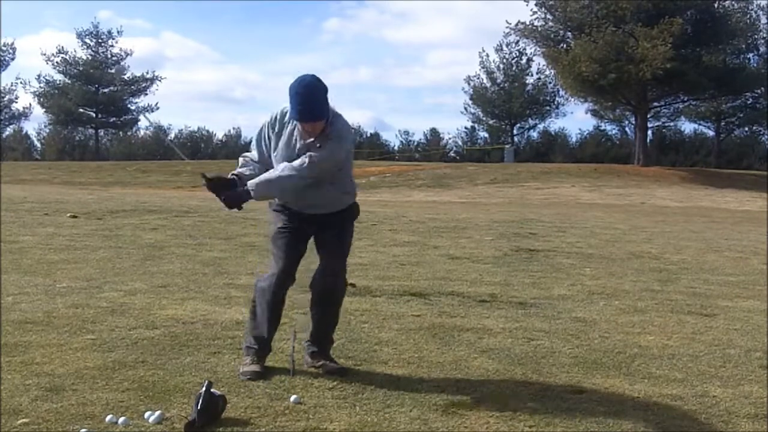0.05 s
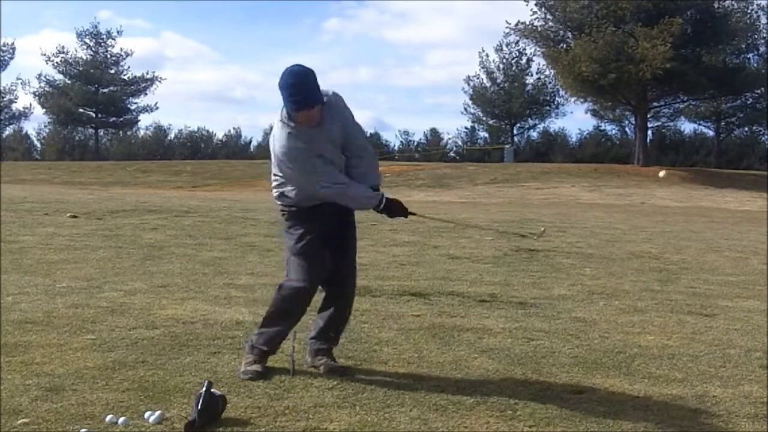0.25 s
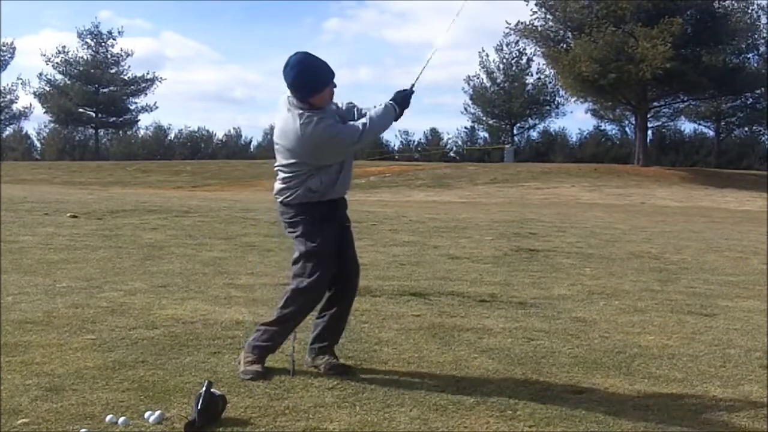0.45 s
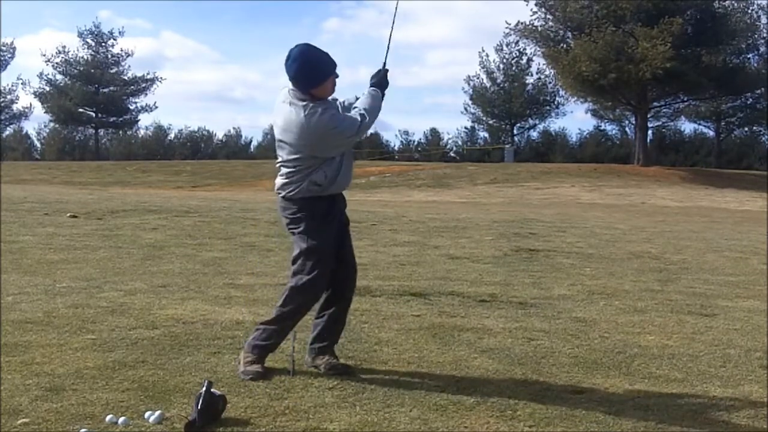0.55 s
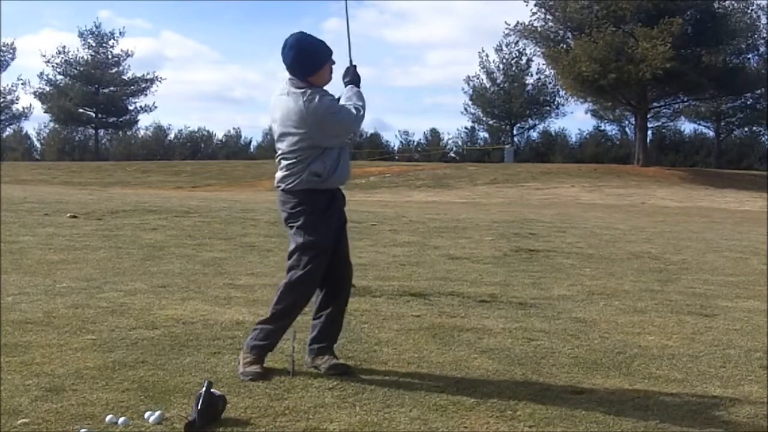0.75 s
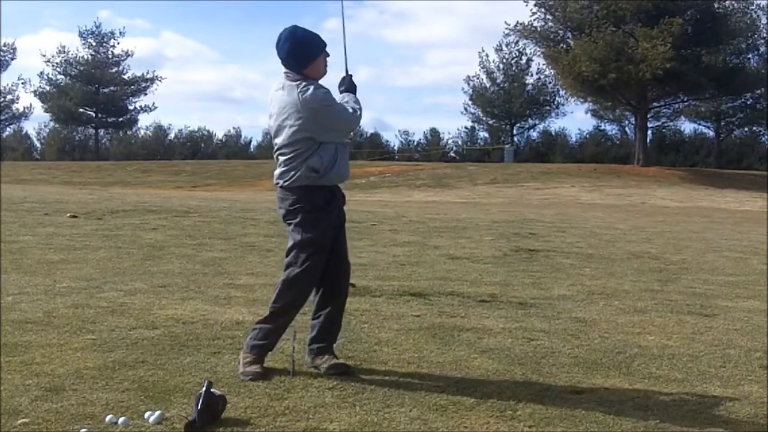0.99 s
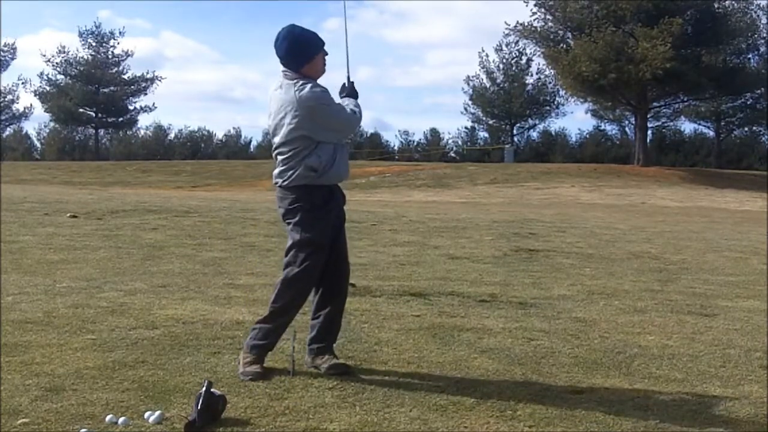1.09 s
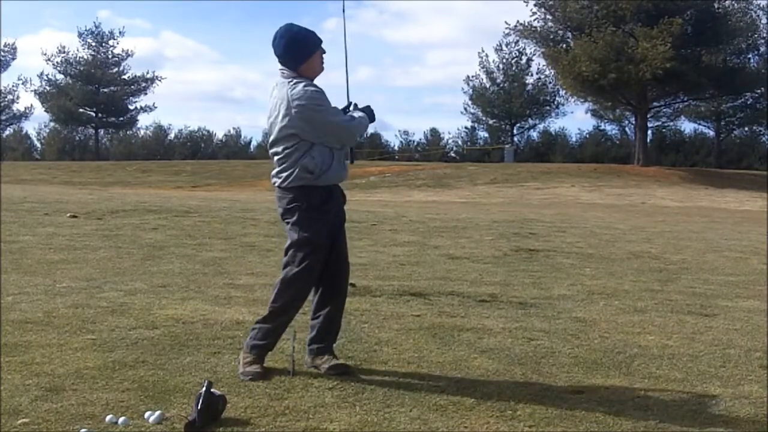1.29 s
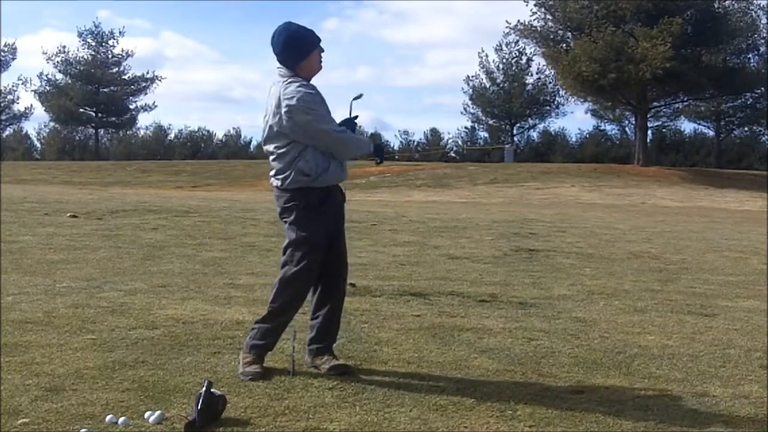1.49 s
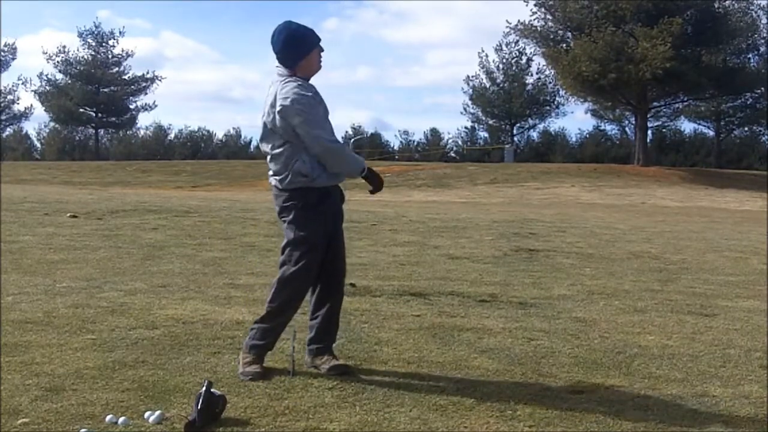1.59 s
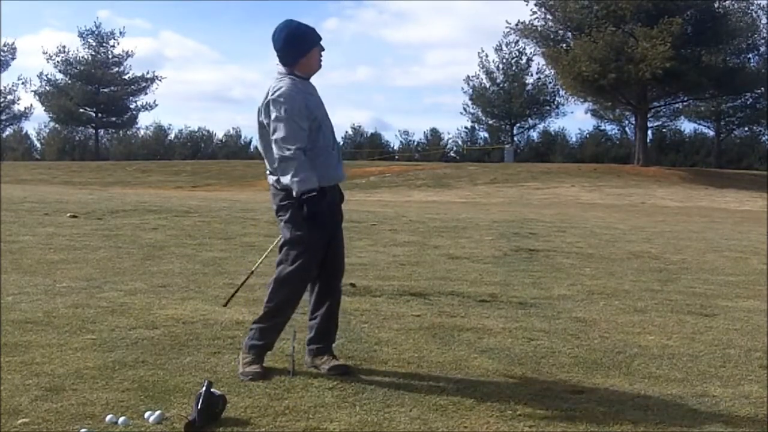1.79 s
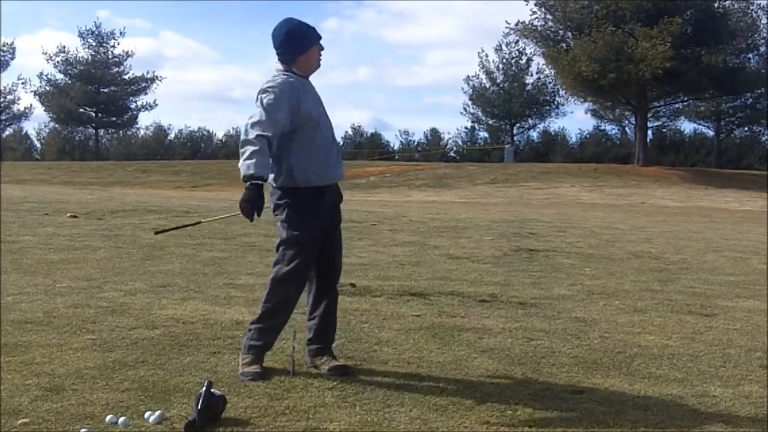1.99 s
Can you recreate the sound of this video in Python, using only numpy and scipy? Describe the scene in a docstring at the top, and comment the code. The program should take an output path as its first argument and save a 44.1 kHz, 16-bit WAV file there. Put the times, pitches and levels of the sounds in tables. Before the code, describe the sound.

A golf iron whooshes briefly and strikes a ball with a sharp, overloaded crack and a tiny scuff of turf, then faint jacket rustle, small ticks and light breeze outdoors, close microphone, mostly in the left channel.

```python
"""Outdoors on grass, an iron swishes down, clips a golf ball off the turf and swings through.
A jacket rustles, a few faint ticks follow, and breeze and a distant wash lie underneath.
Short pushes ring the club head and ball; shaped noise makes the rushing air, torn turf, cloth and wind.
One close microphone feeds the left input and overloads on the blow. The right input holds only
a faint upside-down leak of the left; both inputs have their own hiss and share a thin whine."""
import sys
import numpy as np
from scipy import signal
from scipy.fft import rfft, irfft
from scipy.io import wavfile
from scipy.ndimage import uniform_filter1d

SR = 44100
rng = np.random.default_rng(int(sys.argv[2]) if len(sys.argv) > 2 else 0)


def to_wav(sig):
    """Store sig (one row per channel, or 1-D mono) as 16-bit WAV at the path in sys.argv[1].

    Samples outside -1..1 are clipped; the rate is SR.
    """
    pcm = np.clip(np.atleast_2d(sig), -1, 1) * 32767
    pcm = np.round(pcm).astype(np.int16)
    wavfile.write(sys.argv[1], SR, pcm.T)  # frames by channels


def nominal_scale(level):
    """Amplitude ratio for a level in decibels (scalar or array-like)."""
    x = np.asarray(level, float) / 20
    return 10 ** x


N = 90404  # length in samples, about 2.05 s

# Source levels hold before the microphone gain. Noise spectra give only a shape (level per Hz):
# noise() brings each one to rms 1, and the source then sets its loudness.

# Touches of the club head with turf and ball: t/s, strength/dB, time to the peak of the push/ms
CONTACTS = [(.2438, -17.5, 0.18), (.2459, 0.5, 0.024), (.2468, -1, 0.022), (.2474, -7.5, 0.026),
            (.2484, -4, 0.042), (.2493, -6.5, 0.11), (.2507, -9.5, 0.048), (0.2522, -12, 0.02),
            (0.256, -16, 0.091), (0.2616, -26, 0.12)]
# Ringing tones of club head and ball, before trimming and damping: f/Hz, level/dB, time to fall 60 dB/s
HEAD_TONES = [(773, -12.5, .02), (1079, -5, 0.024), (1300, -7.5, .024), (1724, 2, 0.037), (2150, -2, 0.028),
              (2595, -6.5, .025), (3370, -10.5, 0.025), (3880, 6, .013), (4400, -6.5, 0.0095),
              (5227, -11.5, 0.024), (6912, -15.5, .02), (8950, -20.5, .015), (10550, -17, 0.0069),
              (13500, -18, .01)]
# Swing of the club: t/s, air rush level/dB, shaft whistle f/Hz
SWING = [(.14, -63, 279), (.188, -58, 340), (.21, -46.5, 380), (.222, -34.5, 390), (.236, -38.5, 325),
         (.246, -36, 315), (.262, -52, 315), (.28, -58, 320), (.31, -60.5, 325), (.34, -79, 320)]
# Spectrum of the air rushing round the head: f/Hz, level/dB
RUSH_SPECTRUM = [(400, -24.5), (600, -9), (900, -4), (1800, -7.5), (2500, -10), (5000, -28), (12000, -49.5),
                 (16000, -80.5)]
# Spectrum of torn grass and soil: f/Hz, level/dB
SPRAY_SPECTRUM = [(150, -30), (320, -4), (600, -8), (1200, -6.5), (2300, -3), (4000, -4.5), (6300, -12.5),
                  (10000, -24), (15000, -45.5)]
# Faint ticks: t/s, starting level/dB, f/Hz, time to fall 60 dB/s
TICKS = [(.348, -48.5, 812.5, 0.027), (.379, -51, 799.3, 0.028), (.437, -52.5, 1987, 0.047),
         (.6968, -47, 801, 0.0065), (.7, -42, 599, 0.012), (.6972, -46.5, 2499, .004),
         (.699, -48, 1600, 0.011), (0.7055, -53, 1300, 0.0071), (.782, -35, 2150, 0.0048),
         (0.785, -32.5, 1599, 0.0044), (.786, -37.5, 657, .01)]
# Loudness of the jacket rustle: t/s, level/dB
CLOTH_LEVEL = [(0, -64.5), (.1, -65.5), (.2, -70), (.3, -64.5), (.36, -60), (.4, -62), (.44, -58.5),
               (.48, -65), (.56, -69.5), (.7, -74), (1.0, -73.5), (1.3, -76.5), (1.68, -74.5),
               (1.76, -66.5), (1.84, -71), (1.92, -74), (2.05, -74)]
# Spectrum of the jacket rustle: f/Hz, level/dB
CLOTH_SPECTRUM = [(180, -35.5), (300, -3), (701, -4), (844, -2.5), (1450, -5), (2000, -5), (12000, -23),
                  (15600, -51), (22000, -120)]
# Loudness of breeze and body-moved air on the microphone: t/s, level/dB
WIND_LEVEL = [(0, -59.5), (.05, -60), (.19, -61), (.23, -54.5), (.25, -52.5), (.29, -52.5), (.36, -64),
              (.41, -52), (.44, -49), (.47, -54.5), (.53, -61.5), (.7, -66.5), (.78, -61), (1.0, -65.5),
              (1.3, -61.5), (1.53, -64.5), (1.6, -59.5), (1.66, -66.5), (2.05, -62)]
# Spectrum of that moving air: f/Hz, level/dB
WIND_SPECTRUM = [(15, -10), (30, -1), (60, -3), (120, -4), (250, -13), (500, -25), (900, -59.5)]
# Spectrum of the distant outdoor wash: f/Hz, level/dB
WASH_SPECTRUM = [(90, -19), (150, -0.5), (390, -5.5), (1400, -13), (3000, -20), (6000, -27), (15500, -40.5)]
# Spectrum of the input hiss: f/Hz, level/dB
HISS_SPECTRUM = [(30, -3), (300, 0), (2000, -3), (6000, -6.5), (15000, -10.5)]
# Hiss level over time, added to each input's own level: t/s, level/dB
HISS_LEVEL = [(0, 2.5), (.5, 2.5), (.65, 0), (2.05, 0)]
# Tones of the electronic whine, before each input's own gain: f/Hz, rms level/dB
WHINE_TONES = [(3058, -83), (5453, -77.5)]
# Constant shift of the waveform: one row for the left input, one for the right (full scale = 1)
STEADY_OFFSET = [
    [.0224],
    [.0015],
]


def curve(rows, col):
    """Draws one column of a table as straight lines over time."""
    rows = np.array(rows)
    t = np.arange(N) / SR
    return np.interp(t, rows[:, 0], rows[:, col], left=rows[0, col], right=rows[-1, col])


def noise(spectrum, grain_db=0):
    """Random noise of rms 1 with the given spectrum; grain_db lifts random short bits to make it grainy."""
    f, db = np.transpose(spectrum)
    white = rng.standard_normal(N)
    lift = np.minimum(rng.exponential(1, N // 40 + 1), 5)  # one draw for every 40 samples
    grainy = white * nominal_scale(grain_db * lift).repeat(40)[:N]
    hz = np.fft.rfftfreq(N, 1 / SR)
    gain_db = np.interp(np.log(hz + 1), np.log(f + 1), db, left=-90)
    shaped = irfft(rfft(grainy) * nominal_scale(gain_db), N)
    return shaped / shaped.std()


def resonate(x, hz, width_hz):
    """Lets through a narrow band, with gain 1 at its centre, that follows the curve hz."""
    turn = np.exp(2j * np.pi * np.cumsum(hz) / SR)
    r = np.exp(-np.pi * width_hz / SR)
    smoothed = signal.lfilter([1 - r], [1, -r], x / turn)  # the moving band, shifted down to 0 Hz
    return 2 * (turn * smoothed).real


def add(mix, s, sound):
    """Mixes a sound in at time s, in seconds."""
    part = mix[round(s * SR):][:len(sound)]
    part += sound[:len(part)]


def push_time(ms):
    """Time over 200 samples, counted in units of ms."""
    return np.arange(200) / SR * 1000 / ms


def blow():
    """Each contact is a short push that rings the damped head; the ball itself cracks once."""
    head_db, crack_db = -6.5, 1
    damping = .6  # share of the free ring time left by turf and hands
    ball_s, crack_ms = .2459, 0.046
    out, t = np.zeros(N), np.arange(2000) / SR
    ring = np.zeros(2000)
    for hz, db, t60 in HEAD_TONES:
        ring += nominal_scale(head_db + db - 60 * t / (t60 * damping)) * np.sin(2 * np.pi * hz * t)
    for s, db, ms in CONTACTS:
        u = push_time(ms)
        push = u * np.exp(-u)
        add(out, s, nominal_scale(db) * np.convolve(ring, push / push.sum()))
    u = push_time(crack_ms)
    crack = -nominal_scale(crack_db) * (1 - u) * np.exp(-u)
    add(out, ball_s - .0001, crack)
    # the blow holds little sound below this frequency in Hz
    low_cut = signal.butter(3, 301.4, "high", fs=SR, output="sos")
    return signal.sosfilt(low_cut, out)


def swing():
    """Air rushes round the head and the shaft sheds a fuzzy whistle that follows the rush."""
    whistle_db, width_hz = 5.5, 140  # whistle level over the rush at its loudest, and its band width
    steepness = 1.05  # whistle change in dB for each dB of rush
    t, rush_db, hz = np.arange(N) / SR, curve(SWING, 1), curve(SWING, 2)
    fade_in = np.clip((t - SWING[0][0]) / 0.045, 0, 1)
    fade_out = np.clip((SWING[-1][0] - t) / .04, 0, 1)
    top_db = max(row[1] for row in SWING)
    whistle = resonate(rng.standard_normal(N), hz, width_hz)
    whistle = resonate(whistle, hz, 2 * width_hz)
    whistle_level = nominal_scale(top_db + whistle_db + steepness * (rush_db - top_db))
    whistle *= whistle_level / whistle.std()
    rush = nominal_scale(rush_db) * noise(RUSH_SPECTRUM, grain_db=0.1)
    return fade_in * fade_out * (rush + whistle)


def spray():
    """Grass and soil tear as the sole cuts through, stopping as it leaves the ground."""
    start_s, end_s, rise_s = .2452, .268, .001
    level_db, t60 = -14, .05  # t60: seconds to fall 60 dB
    t = np.maximum(np.arange(N) / SR - start_s, 0)
    rise = np.minimum(t / rise_s, 1)
    stop = np.clip((end_s - start_s - t) / .005, 0, 1)
    return rise * stop * nominal_scale(level_db - 60 * t / t60) * noise(SPRAY_SPECTRUM, grain_db=0.5)


def thud():
    """The ground answers the sole with one short low ring."""
    start_s, level_db, hz, t60 = .2436, -17.5, 316, 0.051  # t60: seconds to fall 60 dB
    t = np.maximum(np.arange(N) / SR - start_s, 0)
    rise = np.minimum(t / .002, 1)
    return nominal_scale(level_db - 60 * t / t60) * rise * -np.sin(2 * np.pi * hz * t)


def puff():
    """The arms sweep past and push air at the microphone in one soft low pressure swing."""
    middle_s, width_s, level_db, hz = .235, .018, -34, 45.6
    t = np.arange(N) / SR - middle_s
    return nominal_scale(level_db) * np.exp(-(t / width_s) ** 2) * np.sin(2 * np.pi * hz * t)


def ticks():
    """Small clicks, each a tone with a rounded start that dies away at once."""
    out, t = np.zeros(N), np.arange(2000) / SR
    for s, db, hz, t60 in TICKS:
        rise = np.minimum(t * hz / 0.7, 1)  # takes 0.7 of a cycle
        add(out, s, rise * nominal_scale(db - 60 * t / t60) * -np.sin(2 * np.pi * hz * t))
    return out


def cloth():
    """The jacket rustles: grainy noise that swells and sinks."""
    return nominal_scale(curve(CLOTH_LEVEL, 1)) * noise(CLOTH_SPECTRUM, grain_db=2.5)


def wind():
    """Breeze and body-moved air rumble on the microphone: low noise of changing strength."""
    return nominal_scale(curve(WIND_LEVEL, 1)) * noise(WIND_SPECTRUM)


def wash():
    """The distant outdoors blends into a soft steady noise."""
    return nominal_scale(-67.5) * noise(WASH_SPECTRUM)


def scene():
    """Everything reaches the one live microphone; the right channel is silent."""
    moving_air = cloth() + wind()
    club = swing() + blow() + spray() + thud() + puff()
    mic = club + ticks() + moving_air + wash()
    return np.array([mic, np.zeros(N)])


def whine():
    """Electronics give thin high tones whose pitches waver slightly together."""
    waver = uniform_filter1d(rng.standard_normal(N), size=4000)
    waver *= .4 / waver.std()  # rms waver in Hz
    out = np.zeros(N)
    for hz, db in WHINE_TONES:
        out += np.sqrt(2) * nominal_scale(db) * np.sin(2 * np.pi * np.cumsum(hz + waver) / SR)
    return out


def hiss(level_db):
    """An input's own electrical noise, at level_db plus a level curve."""
    return nominal_scale(level_db + curve(HISS_LEVEL, 1)) * noise(HISS_SPECTRUM)


def band_limit(x):
    """A steep low-pass at the top of the band."""
    return signal.sosfilt(signal.butter(12, 15540, fs=SR, output="sos"), x)


def record(dry):
    """The left input clips and leaks, upside down and brighter, into the right; both add hiss and whine."""
    ceiling = .975  # clipping level, full scale = 1
    mic = nominal_scale(7) * dry[0]
    left = np.clip(mic, -ceiling, ceiling)
    treble = np.diff(mic, prepend=0)  # sample-to-sample change of the unclipped sound
    right = -nominal_scale(-18.5) * (left + treble)
    tones = whine()
    left = left + hiss(-63.5) + nominal_scale(1) * tones
    right = right + hiss(-63) + nominal_scale(2.5) * tones
    return band_limit(np.array([left, right]) + STEADY_OFFSET)


dry = scene()
out = record(dry)
to_wav(out)
```